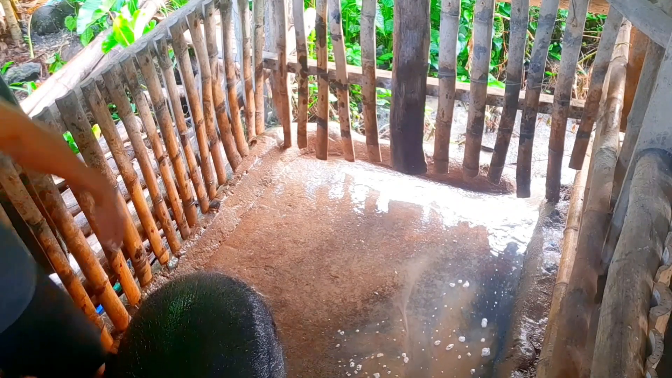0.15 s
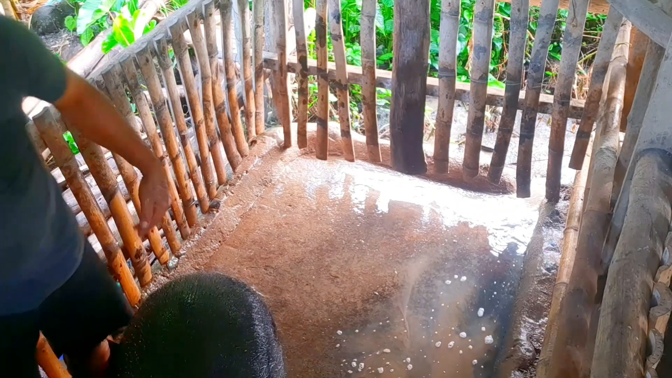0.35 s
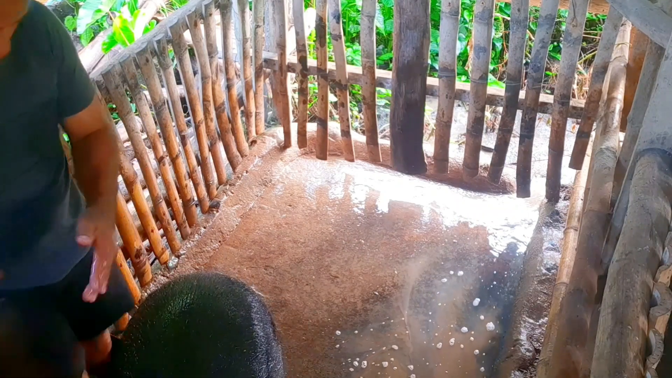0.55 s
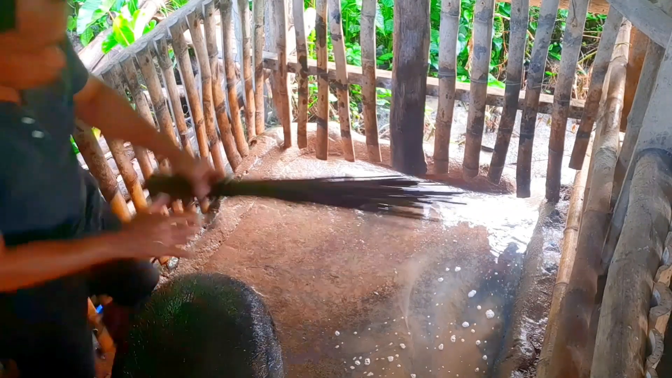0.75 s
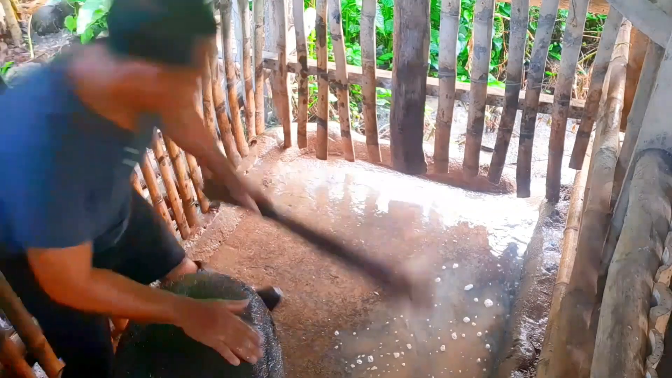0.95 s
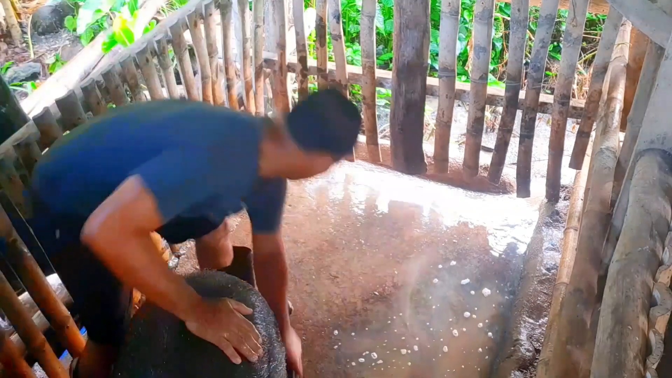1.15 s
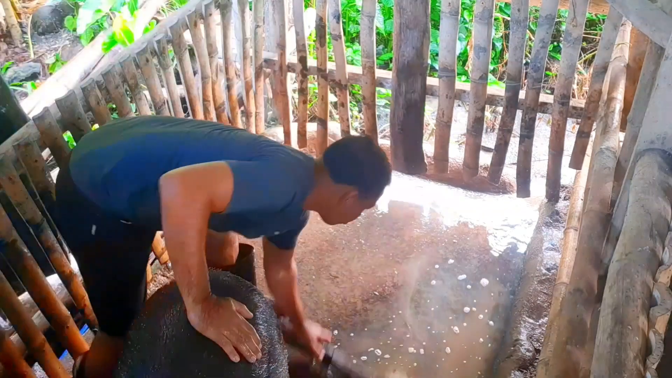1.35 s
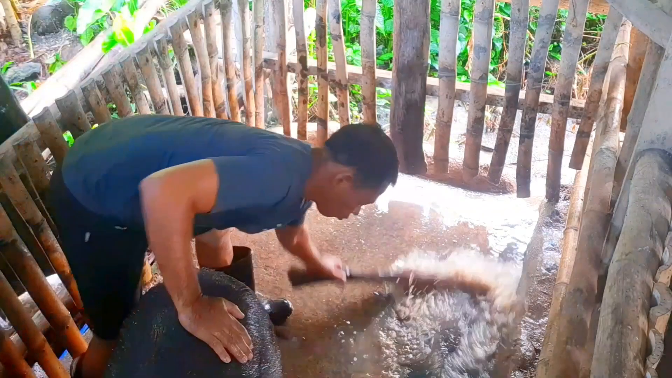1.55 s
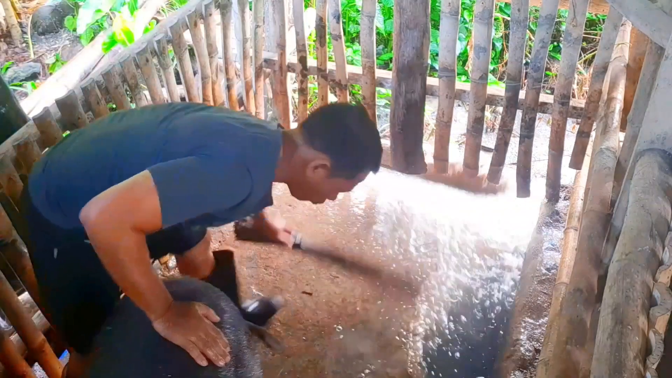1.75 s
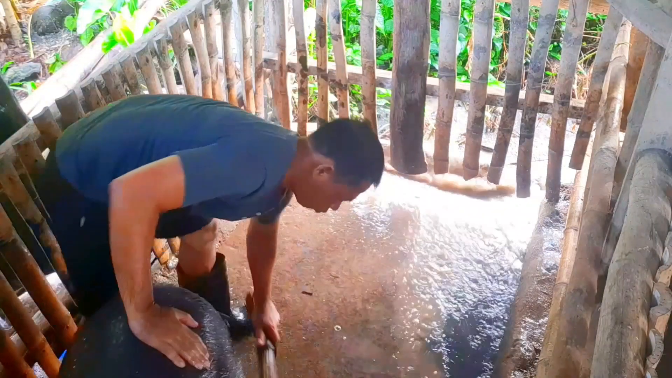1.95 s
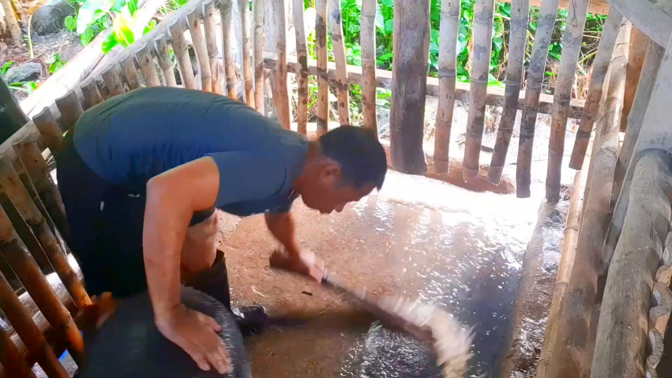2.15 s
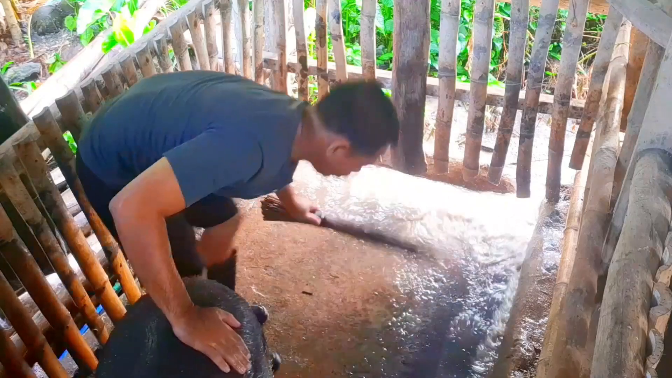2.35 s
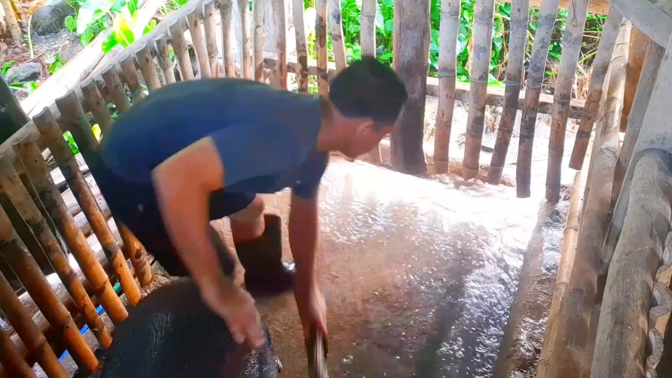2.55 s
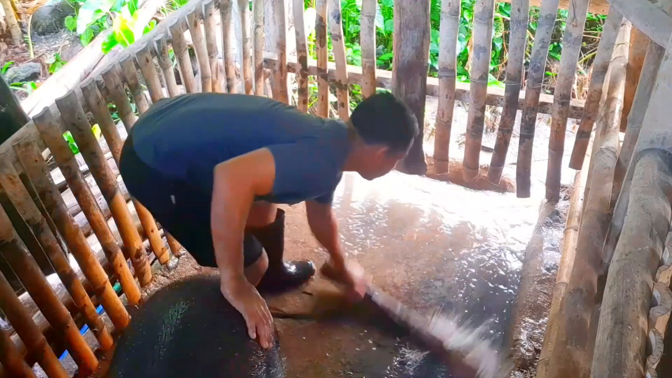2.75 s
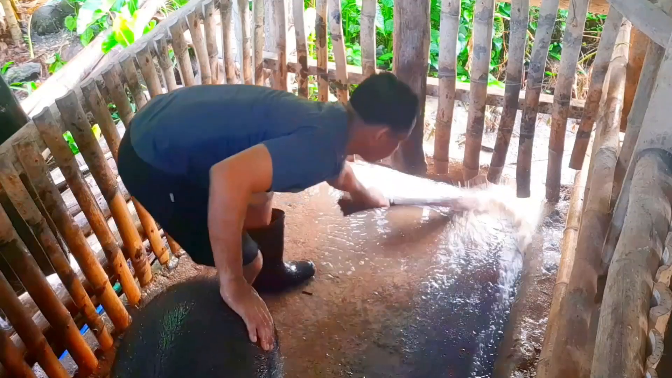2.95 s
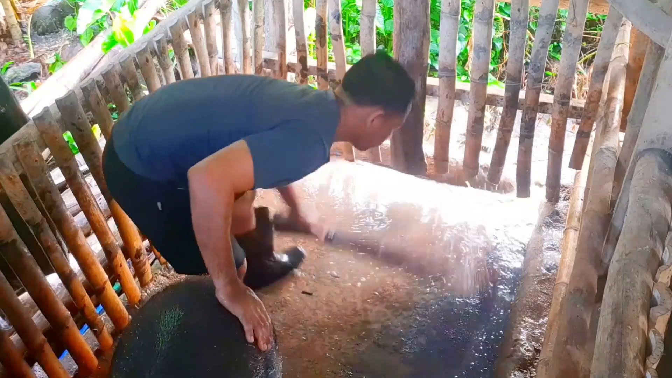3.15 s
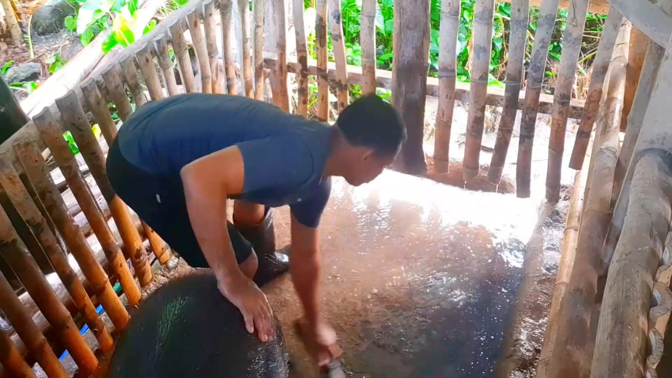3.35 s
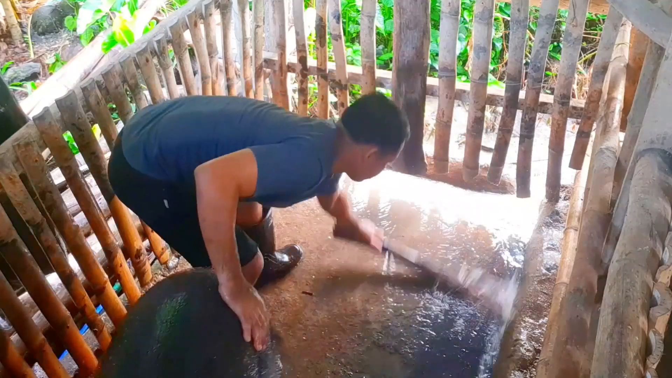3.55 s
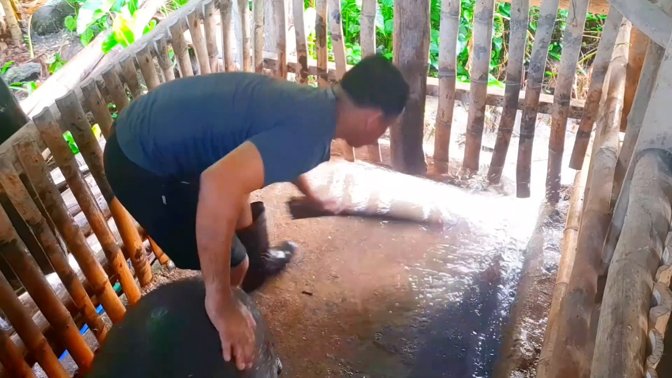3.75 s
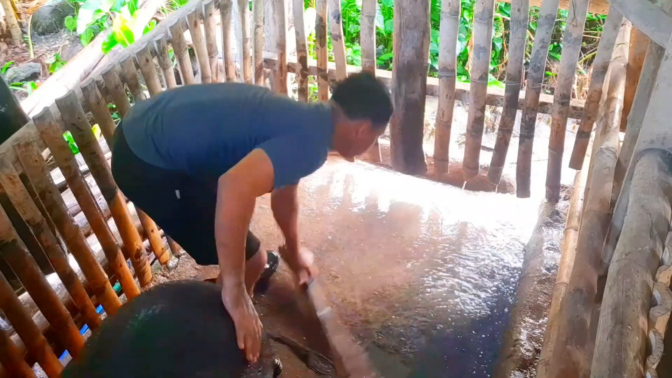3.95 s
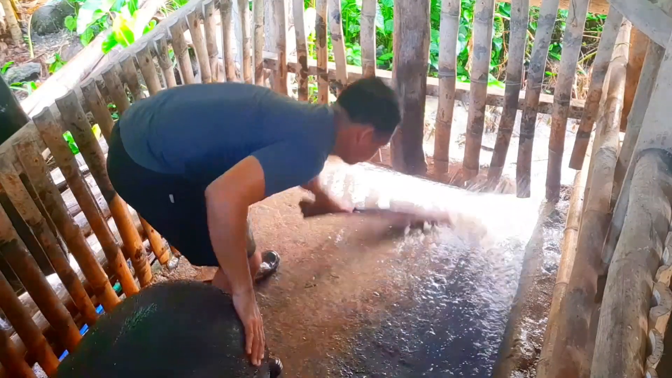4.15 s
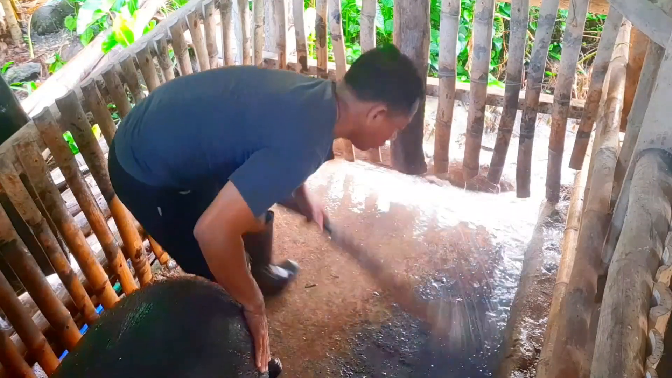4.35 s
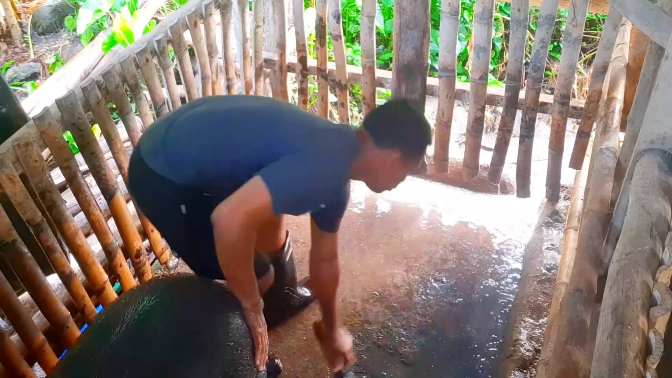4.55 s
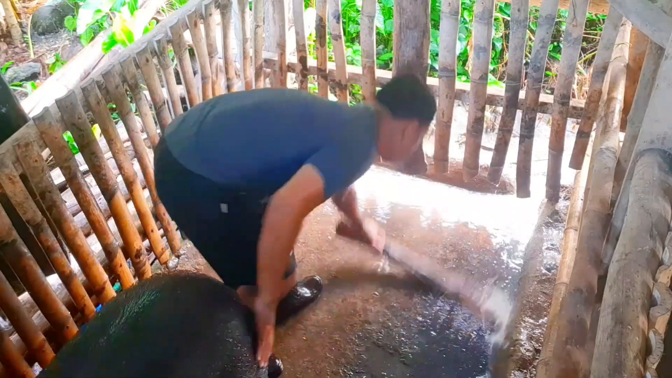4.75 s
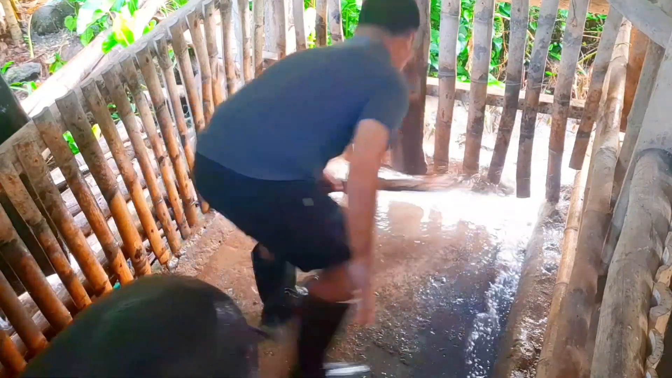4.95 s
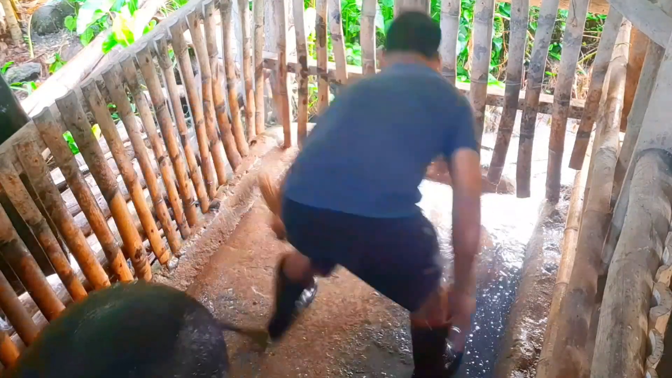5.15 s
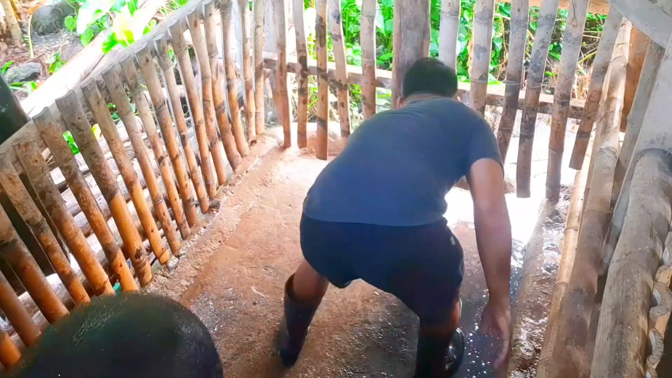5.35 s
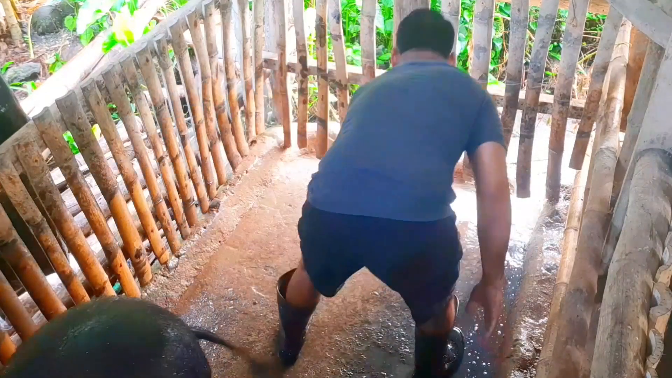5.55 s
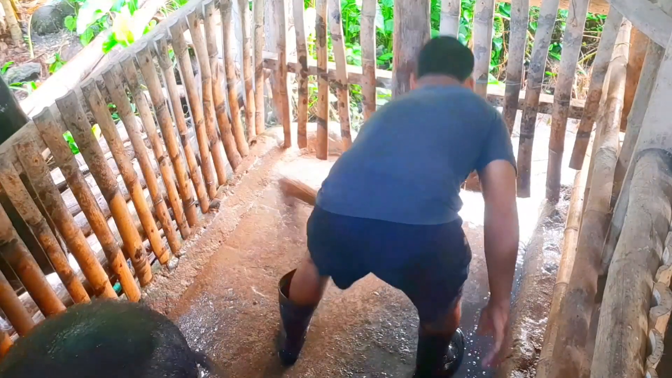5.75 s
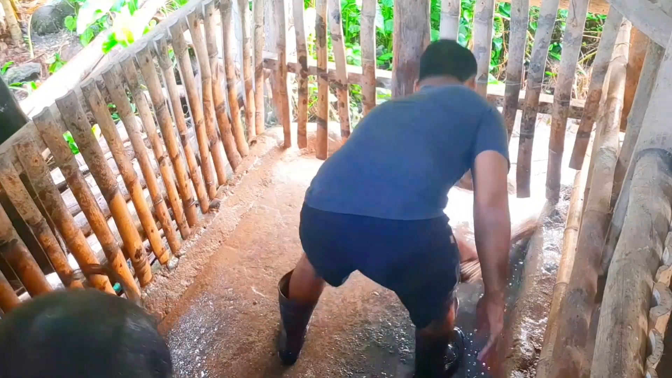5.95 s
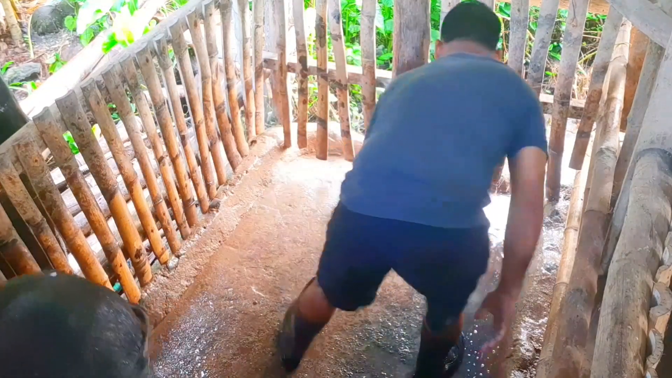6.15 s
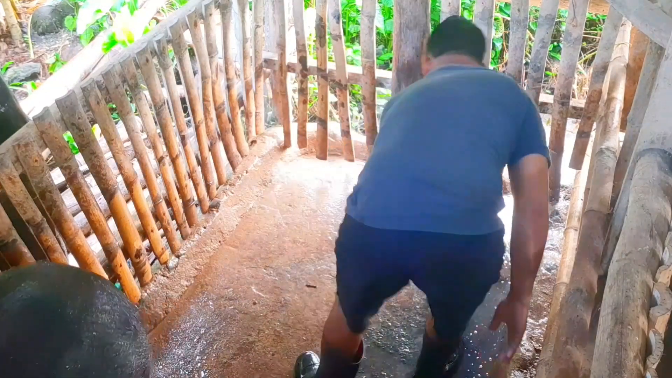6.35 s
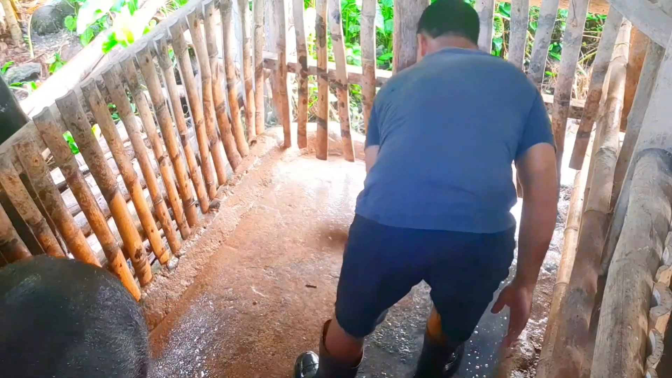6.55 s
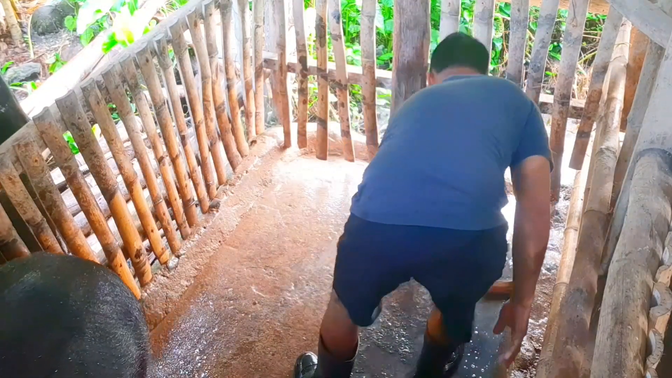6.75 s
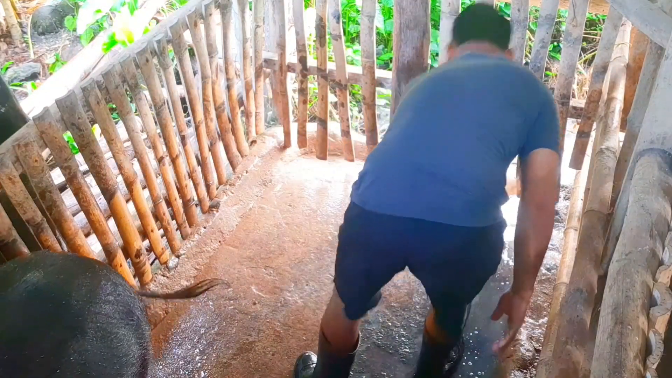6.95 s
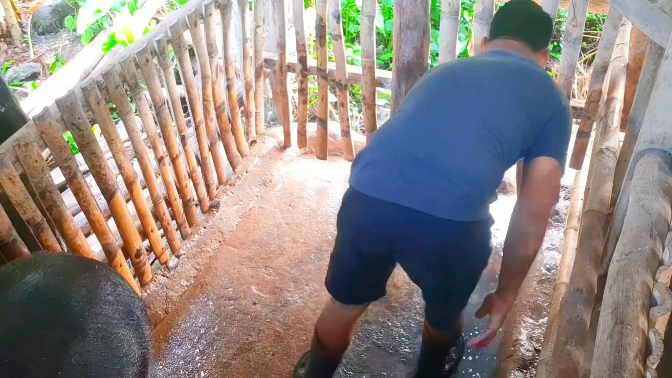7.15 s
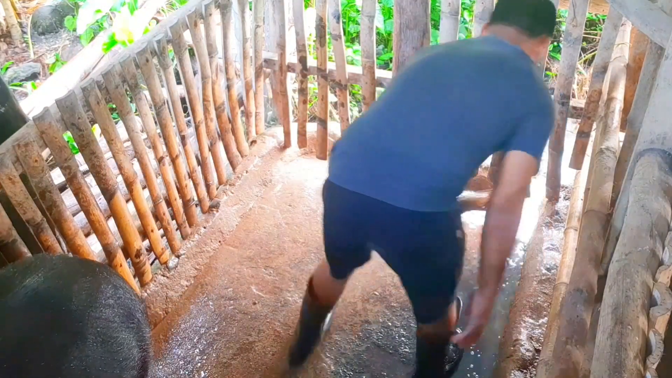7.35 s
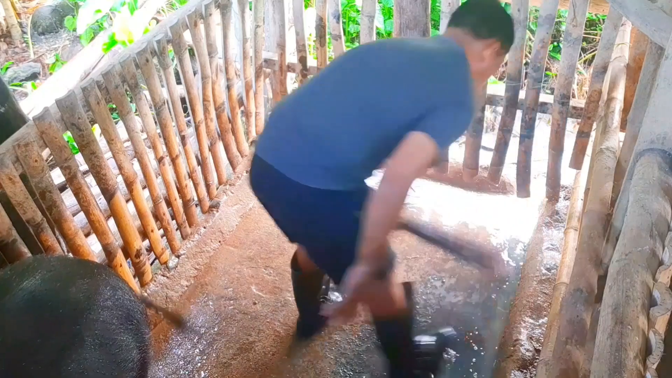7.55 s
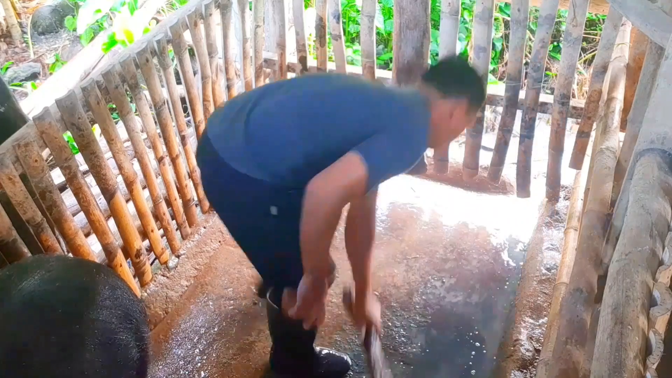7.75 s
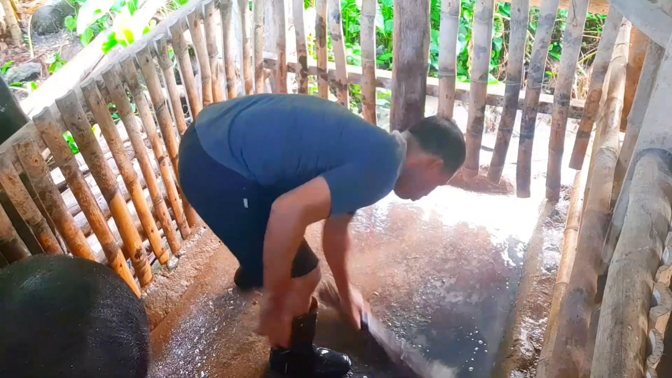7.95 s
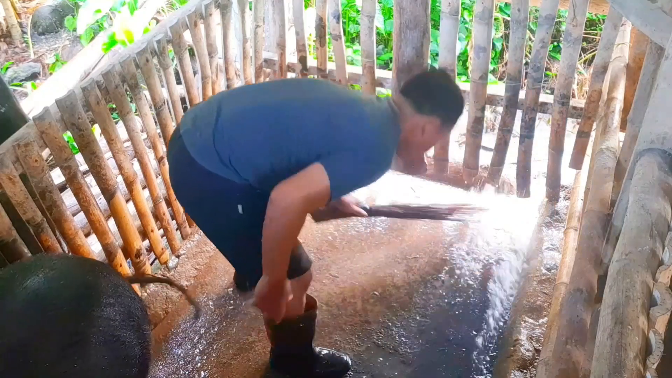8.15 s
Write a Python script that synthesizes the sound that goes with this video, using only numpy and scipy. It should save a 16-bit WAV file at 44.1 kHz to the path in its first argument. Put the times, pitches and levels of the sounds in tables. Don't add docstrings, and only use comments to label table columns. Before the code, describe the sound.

Close stereo pickup in an open-air animal pen. Faint rustling and a sharp hollow boot knock come first, then a stiff twig broom scrapes wet concrete in quick, harsh strokes, each throwing a hissing spray. Rubber squeaks and small knocks fall between them. Strokes weaken, a few knocks follow, and one strong push ends it. Insects trill over a low outdoor rumble.

```python
import sys
import numpy as np
from scipy import signal
from scipy.fft import rfft, irfft, next_fast_len
from scipy.io import wavfile
from scipy.ndimage import uniform_filter1d

SR = 44100
rng = np.random.default_rng(int(sys.argv[2]) if len(sys.argv) > 2 else 0)


def to_wav(s):
    ch = np.atleast_2d(s).T
    pcm = np.round(np.clip(ch, -1, 1) * 32767)
    wavfile.write(sys.argv[1], SR, pcm.astype(np.int16))


def volts_from_db(level):
    exponent = np.asarray(level, float) / 20
    return 10 ** exponent


N = 361619


def evened(x):
    return x / np.sqrt(np.mean(x ** 2) + 1e-20)


def read(points, hz):
    f, value = np.transpose(points)
    return np.interp(np.log(hz + 1), np.log(f + 1), value)


def along(rows):
    s, level_db = np.transpose(rows)
    return np.interp(np.arange(N) / SR, s, level_db)


def add(mix, s, sound):
    part = mix[round(s * SR):][:len(sound)]
    part += sound[:len(part)]


def smooth_twice(x, size, mode="reflect"):
    once = uniform_filter1d(x, size=size, axis=0, mode=mode)
    return evened(uniform_filter1d(once, size=size, axis=0, mode=mode))


def resonate(x, hz, width):
    turn = np.exp(2j * np.pi * np.cumsum(hz * np.ones(len(x))) / SR)
    r = np.exp(-np.pi * width / SR)
    return 2 * (turn * signal.lfilter([1 - r], [1, -r], x / turn + 1e-18)).real


def noise_mode(noise, hz, width, second_width=None):
    return evened(resonate(resonate(noise, hz, width), hz, second_width or width))


def ports(a, b, gain=lambda hz: 1, same=None):
    # pitch_hz, left-right likeness (0-1)
    likeness = [(60, 0.75), (130, 0.91), (290, 0.84), (640, 0.83), (1200, 0.07), (2500, 0.29), (6000, 0.05),
                (15000, 0.045)]
    # pitch_hz, left minus right level_db
    balance = [(60, 5), (120, 7.5), (240, 3.5), (700, 3), (1300, -1.5), (2400, -8.5), (4400, -9),
               (6800, -16), (8600, -3.5), (10500, 0.5), (15000, -23)]
    lag_s = 0.14 / 1000
    size = next_fast_len(N)
    hz = np.fft.rfftfreq(size, 1 / SR)
    if same is None:
        same = np.clip(read(likeness, hz), -1, 1)
    za, zb = rfft(a, size), rfft(b, size)
    lean = volts_from_db(read(balance, hz) / 2)
    left = za * lean * np.exp(-2j * np.pi * hz * lag_s)
    right = (same * za + np.sqrt(1 - same ** 2) * zb) / lean
    z = np.array([left, right]) * gain(hz)
    return irfft(z / np.sqrt((lean ** 2 + lean ** -2) / 2), size)[:, :N]


def patchy(x, db):
    hz, t, z = signal.stft(x, SR, nperseg=256)
    patches = uniform_filter1d(rng.standard_normal((len(t), len(hz))), size=7, axis=0)
    patches = evened(uniform_filter1d(patches, size=5, axis=1))
    return signal.istft(z * volts_from_db(db * patches.T), SR, nperseg=256)[1][:, :N]


def outdoors():
    # pitch_hz, level_db per Hz
    rumble_shape = [(12, -44), (20, -24), (49, -18.5), (69, -6), (81, -1.5), (92, -7), (132, -11.5),
                    (170, -21.5), (220, -45), (370, -120)]
    murmur_shape = [(94, -29), (160, -7.5), (232, -4.5), (330, -0.5), (371, 1), (700, -14), (910, -43),
                    (1540, -120)]
    air_shape = [(300, -27), (550, -19.5), (900, -16), (1500, -29), (3200, -20.5), (5600, -38.5),
                 (7600, -30), (8200, -41), (11000, -31), (14300, -18.5), (16000, -21)]
    # start_s, level_db
    yard = [(0, -50.5), (1.3, -50), (1.7, -58), (1.9, -50), (2.6, -54.5), (2.95, -63.5), (3.3, -57),
            (3.6, -59), (4.85, -58.5), (5.04, -59), (5.58, -63), (5.72, -43), (6.05, -59.5), (6.3, -55.5),
            (6.6, -62), (7.5, -57), (7.75, -51), (8.2, -53)]
    shuffle = [(0, -51.5), (.9, -57.5), (1.45, -49.5), (1.7, -53.5), (1.95, -43.5), (2.5, -58),
               (3.3, -58.5), (3.6, -55), (5.03, -66.5), (5.2, -48.5), (5.58, -76.5), (5.75, -42.5),
               (6.08, -65.5), (6.32, -45.5), (6.56, -75.5), (6.8, -60.5), (7.45, -65), (7.75, -54)]
    a, b, c, d, e, f = rng.standard_normal((6, N))
    lumps = volts_from_db(2.5 * smooth_twice(c, 2500, mode="wrap"))
    rumble = evened(ports(a, b, lambda hz: volts_from_db(read(rumble_shape, hz))))
    murmur = evened(lumps * ports(e, f, lambda hz: volts_from_db(read(murmur_shape, hz))))
    air = evened(ports(c, d, lambda hz: volts_from_db(read(air_shape, hz))))
    mix = rumble * lumps ** 0.67 * volts_from_db(along(yard) + 4.5)
    mix += murmur * volts_from_db(along(shuffle))
    return mix + patchy(air, db=3.0) * volts_from_db(-72)


def insects():
    # start_s, level_db
    insect = [(0, -61), (1.2, -62.5), (3, -72), (5, -66), (6.6, -70), (8.2, -65)]
    # pitch_hz, width_hz, level_db
    trill = [(7050, 180, 0), (7150, 500, -3), (10000, 700, -13)]
    trill_hz = 43
    t = np.arange(N) / SR
    drift = evened(uniform_filter1d(rng.standard_normal(N), size=4000))
    throb = 0.75 + np.maximum(np.sin(2 * np.pi * trill_hz * t + 0.7 * drift), 0) ** 2
    wings = np.zeros((2, N))
    for wing, noise in zip(wings, rng.standard_normal((2, N))):
        for hz, width, db in trill:
            wing += volts_from_db(db) * noise_mode(noise, hz, width)
    return volts_from_db(along(insect) + 6.5) * evened(ports(*(throb * wings)))


def tick(db, hz, t60):
    t = np.arange(4000) / SR
    return volts_from_db(db - 60 * t / t60) * noise_mode(rng.standard_normal(len(t)), hz, 0.41 * hz, 0.67 * hz)


def knock(db, hz, slap_db, thud_db):
    t = np.arange(6000) / SR
    t60 = 0.079 * volts_from_db(0.39 * (-28.5 - db))
    noise = rng.standard_normal((3, len(t)))
    ring = np.sin(2 * np.pi * hz * t) + 0.5 * noise_mode(noise[0], 1.05 * hz, 160)
    slap = 0
    for ratio, mode_db in ((1.96, -1.5), (3.8, -10.5)):
        tone = np.sin(2 * np.pi * ratio * hz * t)
        slap = slap + volts_from_db(mode_db) * (tone + 0.78 * noise_mode(noise[1], ratio * hz, 200))
    slap = slap * volts_from_db(slap_db - 8.5 + 15 * t / t60)
    thud = noise_mode(noise[2], 230, 140) * volts_from_db(thud_db - 1.5 + 25 * t / t60)
    rise = 1 - np.exp(-t / 0.0015)
    return volts_from_db(db - 60 * t / t60) * rise * (ring + slap + thud)


def squeak(length, first_hz, last_hz, top_db, over_db):
    edge_db, overtone_sag_db, wobble_hz = -9.5, -8.5, 7
    t = np.arange(0, length, 1 / SR)
    hz = first_hz + (last_hz - first_hz) * t / length
    db = top_db + edge_db * (1 - np.sin(np.pi * t / length))
    over_db = over_db + overtone_sag_db * (np.sin(np.pi * (t / length) ** 1.4) - 0.5)
    wobble = evened(uniform_filter1d(rng.standard_normal(len(t)), size=300))
    turn = 2 * np.pi * np.cumsum(hz + wobble_hz * (hz / 300) ** 0.85 * wobble) / SR
    overtones = np.sin(2 * turn) + 0.34 * np.sin(3 * turn) + 0.11 * np.sin(4 * turn)
    tone = np.sin(turn) + volts_from_db(over_db) * overtones
    return np.sqrt(2) * volts_from_db(db + 2.1 * wobble[::-1]) * tone * signal.windows.tukey(len(t), 0.35)


def boots():
    # start_s, peak level_db, hollow ring pitch_hz, slap re peak_db, thud re peak_db
    knocks = [(0.554, -45, 422, -15, -3.5), (0.988, -15.5, 487, -10, -14), (1.05, -49, 480, -20, -20),
              (7.671, -36.5, 433, -0.5, -4), (2.42, -41, 429, -17, -23), (3.169, -40, 660, -20, -33),
              (3.629, -30, 478, -31, -11.5), (3.802, -40.5, 408, -7, -9), (3.841, -37.5, 508, -31, -34),
              (4.44, -36.5, 289, -19, -27), (5.09, -34, 472, -0.5, -3.5), (5.672, -36, 463, 9, -17),
              (5.691, -21, 483, 9, -7.5), (5.708, -41, 460, 11, 10), (6.207, -37.5, 324, -3, -7.5),
              (6.264, -34, 350, -16.5, -35), (7.747, -46, 406, -16, -5), (7.794, -45, 362, -36, 6),
              (7.812, -28, 412, -9, -18)]
    # start_s, peak level_db, centre pitch_hz, t60_s
    ticks = [
        (0.131, -39.5, 14300, 0.18),
        (.978, -43, 5940, 0.051),
        (0.988, -32, 3140, 0.04),
        (5.092, -49, 900, 0.04),
        (7.673, -63, 1500, .05),
        (7.812, -44, 1500, 0.045),
        (6.21, -50, 900, .03),
    ]
    # start_s, length_s, first pitch_hz, last pitch_hz, level_db
    squeaks = [
        (1.79, .14, 228.5, 204.5, -32.5),
        (2.54, 0.073, 221, 193, -42),
        (3.45, 0.11, 442, 528, -31.5),
    ]
    slurps = [
        (7.658, .055, 336, 350, -33.5),
        (2.87, 0.052, 790, 630, -28.5),
        (2.93, .06, 750, 640, -34.5),
        (3.54, 0.11, 1020, 1012, -33),
    ]
    chirps = [
        (.822, .043, 2120, 2100, -60),
        (6.185, 0.087, 2820, 2830, -55),
    ]
    hums = [
        (5.49, .18, 105, 102.7, -43.5),
    ]
    mix = np.zeros(N)
    for s, *row in knocks:
        add(mix, s, knock(*row))
    for s, *row in ticks:
        add(mix, s, tick(*row))
    for rows, overtones_db in (squeaks, -6), (slurps, -18), (chirps, -40), (hums, -32):
        for s, *row in rows:
            add(mix, s, squeak(*row, overtones_db))
    return ports(mix, mix, same=0.98)


def scratches(per_s, spread_db, ms):
    catches = volts_from_db(spread_db * np.minimum(rng.exponential(1, N), 5)) * (rng.random(N) < per_s / SR)
    bursts = signal.lfilter([1], [1, -np.exp(-1000 / (ms * SR))], catches)
    return bursts * rng.standard_normal((2, N))


def ringing(per_s, spread_db, cycles, count=28):
    out = np.zeros((2, N))
    for hz in np.geomspace(350, 9000, count):
        at = rng.integers(0, N, int(per_s * N / SR / count * np.sqrt(hz / 2000)))
        size = volts_from_db(spread_db * np.minimum(rng.exponential(1, len(at)), 5))
        train = np.zeros((2, N))
        train[:, at] = size * rng.choice([-1., 1.], (2, len(at)))
        u = np.arange(int(3 * cycles * SR / hz)) * hz / SR
        tone = u * np.exp(-3 * u / cycles) * np.sin(2 * np.pi * u * (1 + 0.00451 * u))
        out += signal.oaconvolve(train, tone[None] * hz ** 0.39, axes=1)[:, :N]
    return evened(out)


def push(t, swell, curve, lift, db, sag_db, lift_db_per_s):
    touch = -28 * (np.maximum(1 - t / 0.019, 0) + np.maximum(1 - t / swell, 0) ** curve)
    sag = sag_db * np.clip((t - swell) / (lift - swell + 0.00087), 0, 1)
    return db + touch + sag - lift_db_per_s * np.maximum(t - lift, 0)


def motion():
    # touch start_s, swell_s, hold_s, full pressure level_db, sag over the hold_db
    strokes = [(1.227, 0.12, 0.26, -19.5, -2), (1.964, 0.086, 0.21, -18.5, 0.5), (2.6, 0.18, 0.17, -20, 1),
               (3.341, 0.14, 0.14, -17.5, -2), (3.92, 0.096, 0.15, -16, -5), (4.55, 0.16, .13, -19, -2),
               (5.159, 0.16, 0.11, -20.5, 2), (5.705, .16, 0.076, -24, 1), (6.24, 0.092, 0.025, -30.5, 4.5),
               (6.654, 0.064, 0.12, -31.5, 0.5), (7.141, 0.04, 0.061, -34.5, 2.5),
               (7.862, 0.1, 0.12, -17.5, -3)]
    # swell_s, full spray level_db, sag until the lift_db, lull in mid push_db
    sprays = [(0.086, -18, -10.5, -14.5), (0.033, -19, -8.5, -2.5), (0.1, -21, -8, -3.5),
              (0.064, -23.5, -0.5, -4), (0.079, -19.5, -11, -4.5), (0.036, -27, 2.5, 0.5),
              (0.051, -36.5, 6.5, 6.5), (0.038, -33.5, 11, 6.5), (0.03, -26.5, 10, 0), (0.077, -22, 0, 0.5),
              (0.028, -30.5, 5.5, 3.5), (0.021, -25.5, -3.5, 2)]
    # swell curve exponent (0.6-4.5), drag re pressure_db, drag growth over the push_db,
    # hiss re pressure and spray_db
    grips = [(1.75, -10.5, 3.5, 2.5), (2.27, -17.5, 7.5, 1), (1.76, -10, -4.5, 2.5), (1.12, -13, -2.5, 2.5),
             (0.92, -19, 2, 3), (2.02, -15, 1, 3), (0.62, -8.5, -9, 1.5), (2.05, -7.5, -12, 2.5),
             (4.5, -4.5, -9, -3.5), (1.34, -12.5, 0, -3), (2.1, -12.5, 1, -3), (1.64, -13, 0.5, 1.5)]
    # start_s, length_s, level_db, spray re level_db, drag re level_db
    rustles = [(0, 0.37, -64.5, -6, 1.5), (0.133, 0.22, -56.5, -7, 2.5), (0.275, 0.38, -68, -9, 2.5),
               (0.553, .14, -66.5, -1, 8.5), (0.664, 0.64, -70, 0, 1), (.995, 0.081, -54, -7, 1),
               (1.72, 0.72, -53.5, -13, 2), (1.935, 0.051, -40.5, 1, -9), (2.385, 0.58, -63.5, -1, 1.5),
               (3.0, 0.18, -45.5, 2, 0), (3.146, .2, -55, -7, 2.5), (3.733, 0.32, -55, -10, -4),
               (4.28, 0.43, -59, -5, -1), (4.973, 0.5, -60.5, -4, -18), (5.546, 0.36, -62, -2, -5),
               (5.67, 0.086, -43.5, 4, 14), (6.899, 0.18, -43.5, 4.5, -12), (7.38, 0.12, -69.5, -3.5, -16),
               (7.55, .11, -69.5, -5.5, -14), (7.657, 0.15, -57, -5.5, -3.5), (8.153, .1, -61, -6, -8)]
    swings = [
        (1.068, 0.14, -75.5, 3, 8.5),
        (1.22, 0.033, -52, 2, -6),
        (2.41, 0.044, -59, -15, 3),
        (1.828, .16, -47, -2.5, -4),
        (3.06, 0.038, -44.5, 11, -17),
        (6.13, 0.23, -56.5, -21, 3.5),
        (7.78, 0.073, -60, -4, 7),
        (3.86, .07, -65, 1, 17.5),
        (4.9, 0.091, -49.5, 9, 0.5),
        (1.7, 0.058, -63, -8, 8),
    ]
    power = np.zeros((N, 4))
    for stroke, wet, grip in zip(strokes, sprays, grips):
        s, swell, hold, db, sag_db = stroke
        wet_swell, wet_db, wet_sag_db, lull_db = wet
        curve, drag_db, late_db, hiss_db = grip
        lift = swell + hold
        t = np.arange(0, lift + 0.35, 1 / SR)
        press = push(t, swell, curve, lift, db, sag_db, 276.5)
        spray = push(t, wet_swell, 1.385, lift, wet_db, wet_sag_db, 264)
        wet_part = np.clip((t - wet_swell) / (lift - wet_swell + 0.001), 0, 1)
        spray = spray + lull_db * np.sin(np.pi * wet_part)
        drag = press + drag_db + late_db * np.minimum(t / lift, 1)
        hiss = press + 0.67 * (spray - press) + hiss_db
        add(power, s, volts_from_db(np.transpose([drag, press, hiss, spray])) ** 2)
    flicker_db = 2.5 * smooth_twice(rng.standard_normal((N + SR, 4)), 900)
    for rows, lean in (rustles, 0.49), (swings, 1.6):
        for s, length, db, spray_db, drag_db in rows:
            t = np.arange(0, length + 0.12, 1 / SR)
            level = db - 17.5 * (1 - np.sin(np.pi * np.minimum(t / length, 1) ** lean)) ** 2
            level = level - 298 * np.maximum(t - length, 0)
            levels = level[:, None] + flicker_db[round(s * SR):][:len(t)]
            levels = levels + [drag_db, 0, 0.3 * spray_db - 1.5, spray_db]
            rise = np.minimum(t / 0.0044, 1)[:, None]
            add(power, s, (volts_from_db(levels) * rise) ** 2)
    return np.sqrt(power.T)


def broom():
    # pitch_hz, level_db per Hz
    twigs = [(88, -57.5), (150, -41), (286, -28), (514, -8.5), (689, -6), (838, -0.5), (1340, 1), (1870, 5),
             (3230, 5), (4780, -7.5), (6280, -5.5), (8590, -26), (11700, -18.5), (15100, -4.5),
             (16000, -7.5)]
    drag, scrape, hiss, spray = motion()
    grit = evened(scratches(6000, 0.72, 3.7)) + volts_from_db(-5.5) * ringing(4000, 1.7, 19.2)
    mist = scratches(7100, 2.8, 3.6)

    def below(hz, edge_hz):
        return 1 / (1 + (hz / edge_hz) ** 12)

    def band(x, low_hz, high_hz):
        def colour(hz):
            return volts_from_db(read(twigs, hz)) * np.sqrt(below(hz, high_hz) - below(hz, low_hz))
        return evened(ports(*x, colour))

    mix = band(grit, 60, 1030) * drag
    mix += band(grit, 1347, 3460) * scrape * volts_from_db(1.0)
    mix += band(grit, 4375, 8400) * hiss * volts_from_db(3.5)
    mix += band(mist, 7080, 18100) * spray * volts_from_db(6.5)
    return patchy(mix, db=1.0)


def scene():
    return outdoors() + insects() + boots() + broom()


def top_cut(x):
    return signal.sosfilt(signal.butter(12, 16200, fs=SR, output="sos"), x)


def record(dry):
    edge = signal.firwin(801, 15850, window=("kaiser", 8), fs=SR)
    mix = signal.oaconvolve(np.clip(dry, -1, 1), edge[None], "same", axes=1)
    return top_cut(mix)


dry = scene()
out = record(dry)
to_wav(out)
```